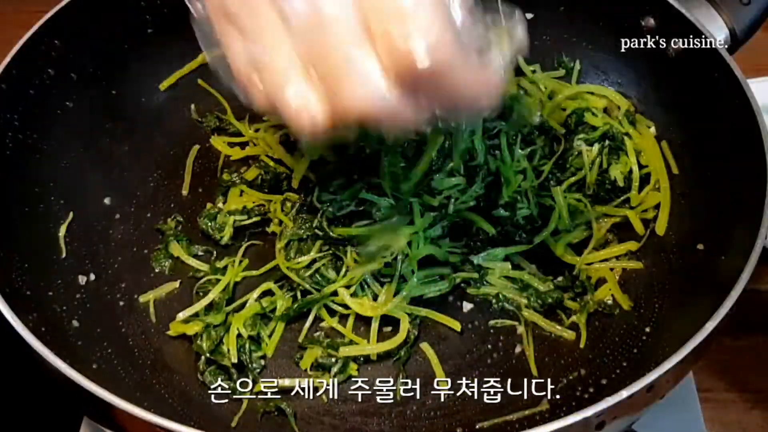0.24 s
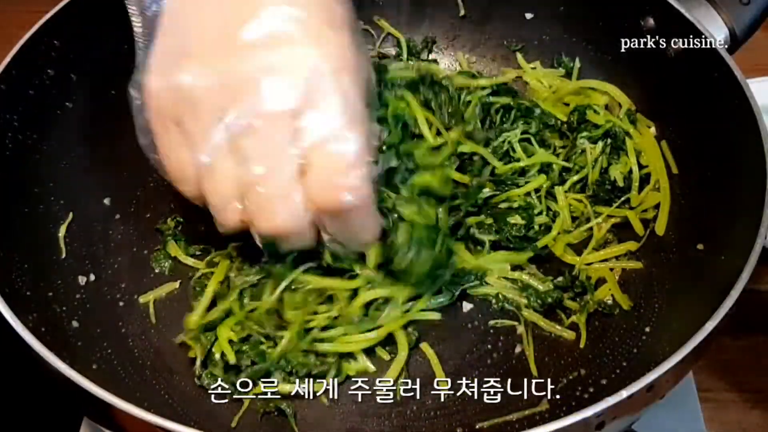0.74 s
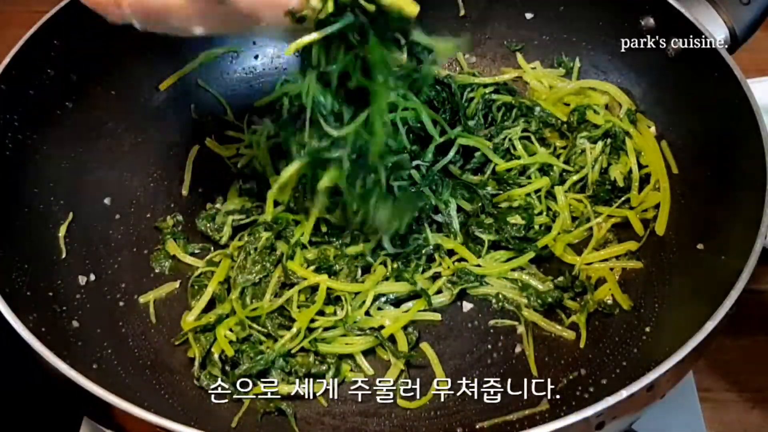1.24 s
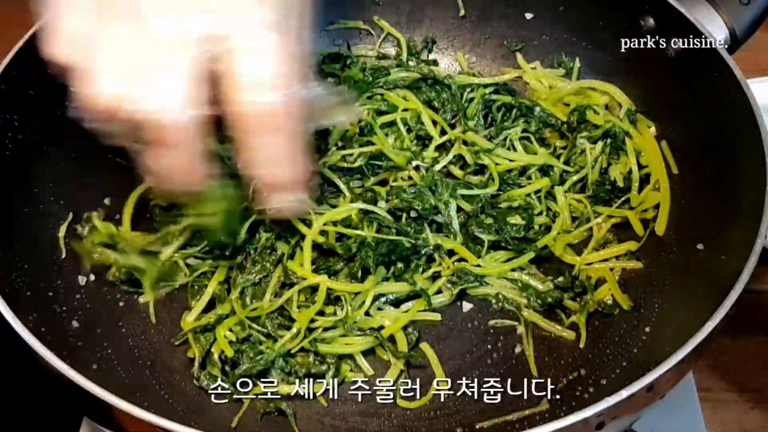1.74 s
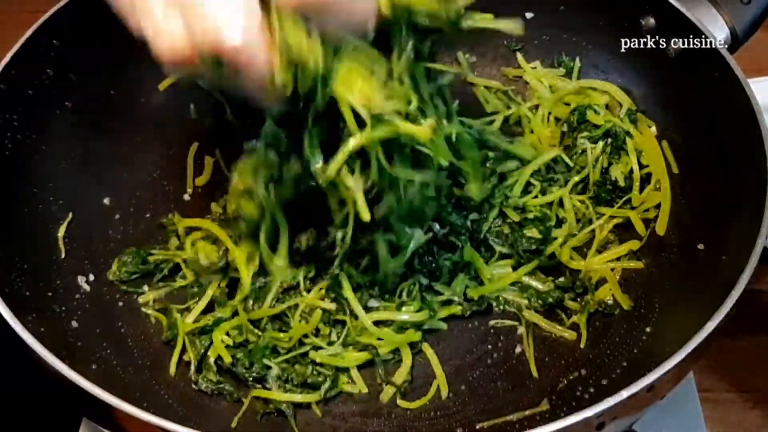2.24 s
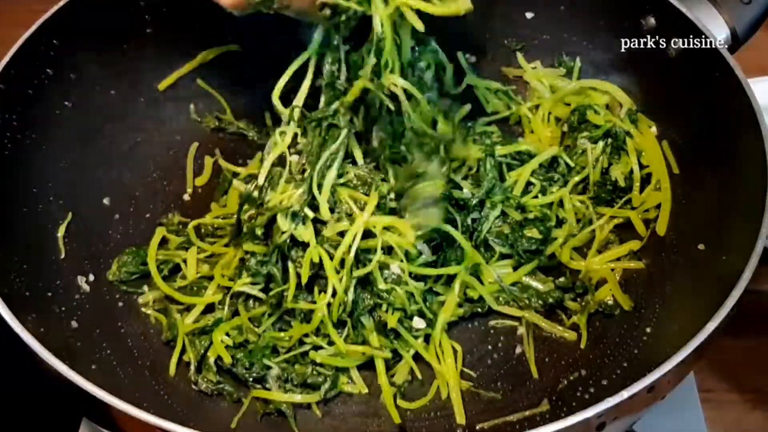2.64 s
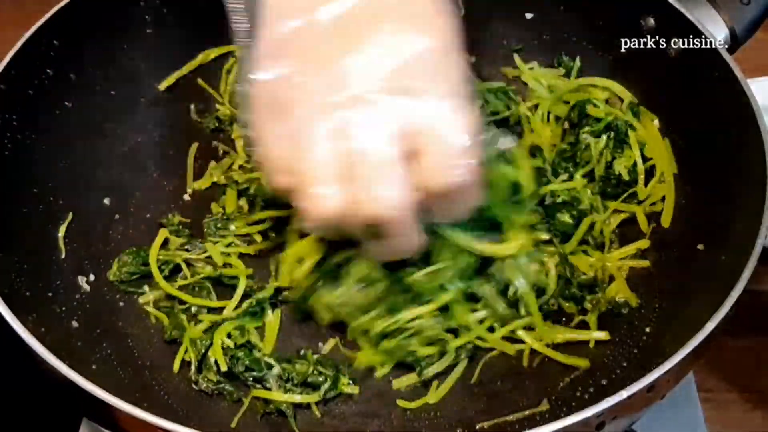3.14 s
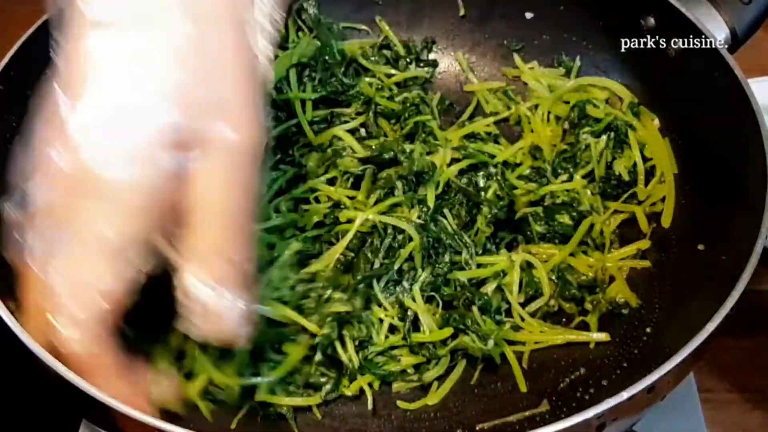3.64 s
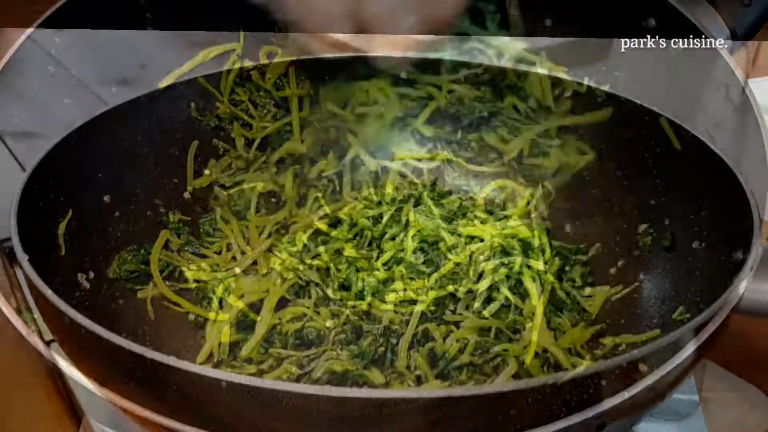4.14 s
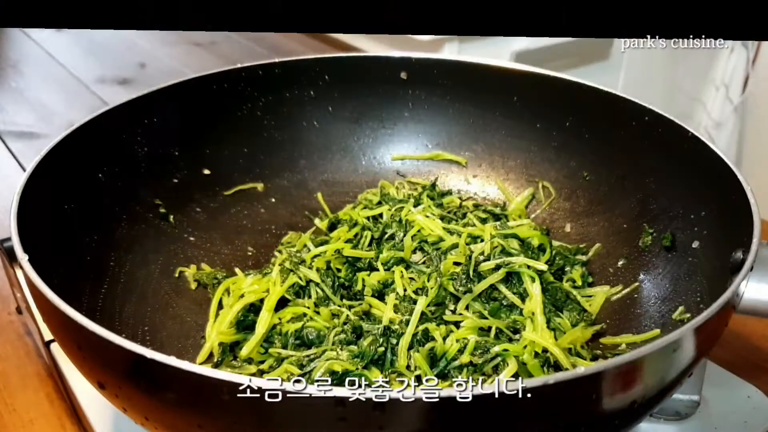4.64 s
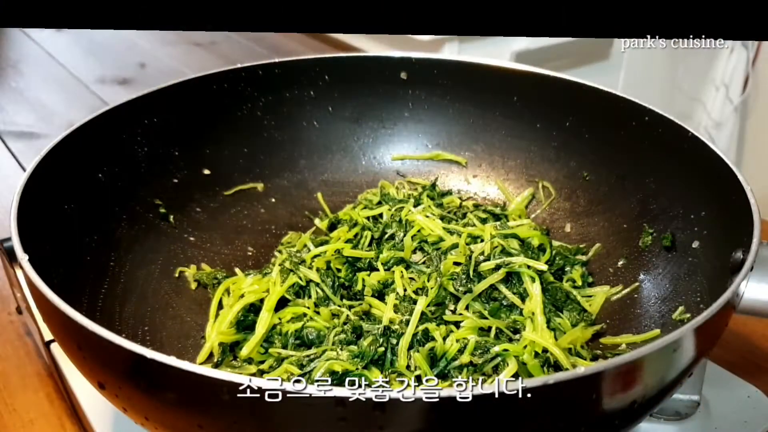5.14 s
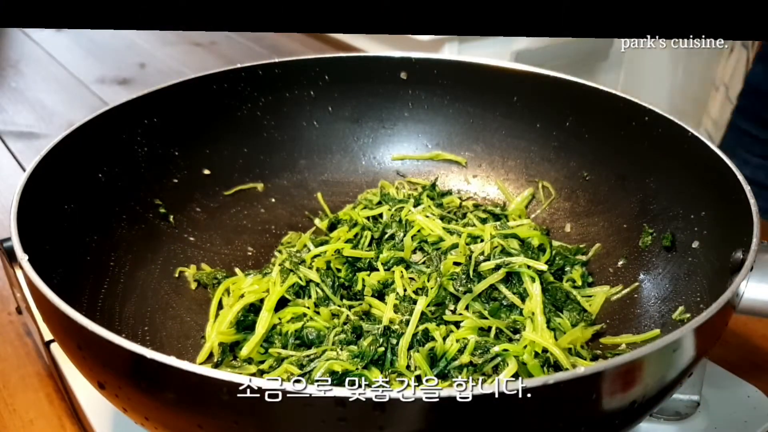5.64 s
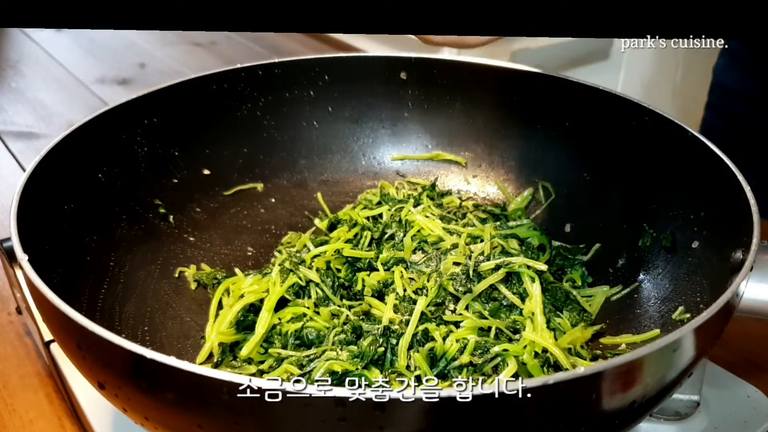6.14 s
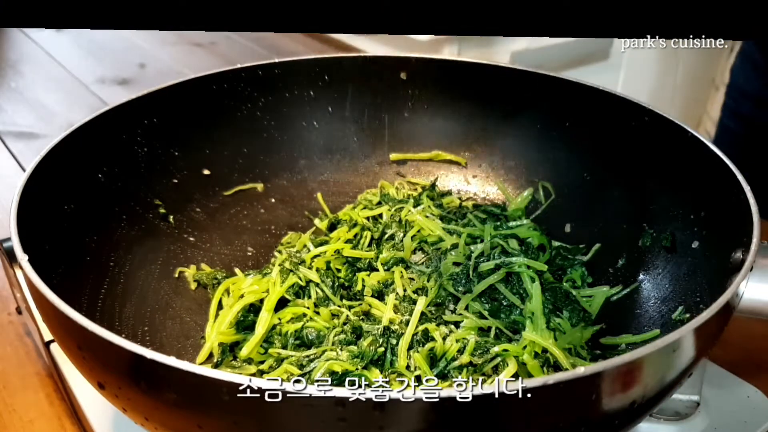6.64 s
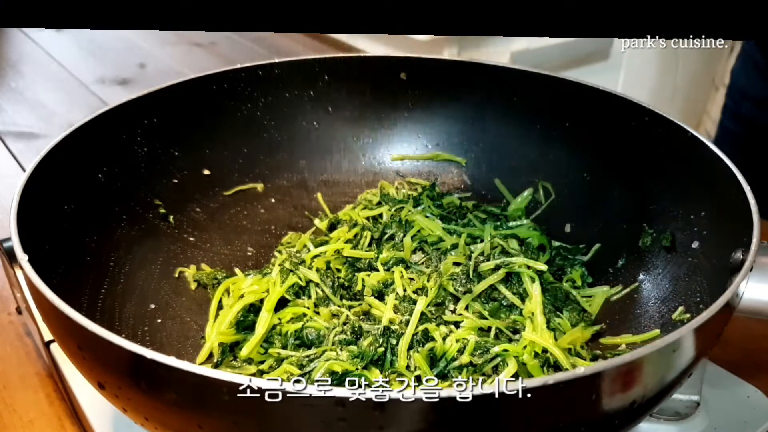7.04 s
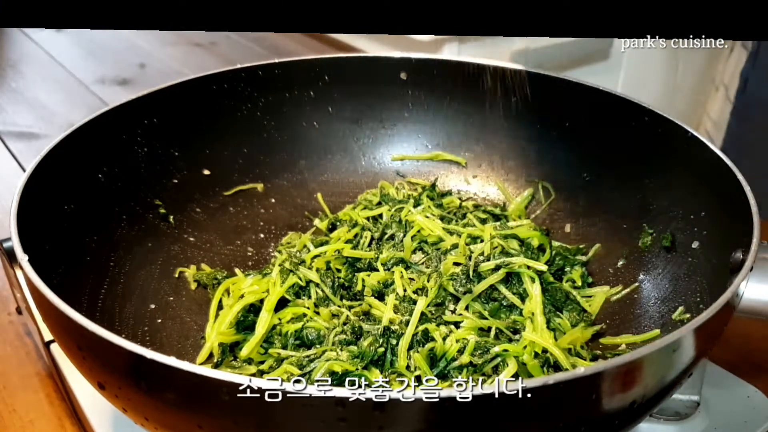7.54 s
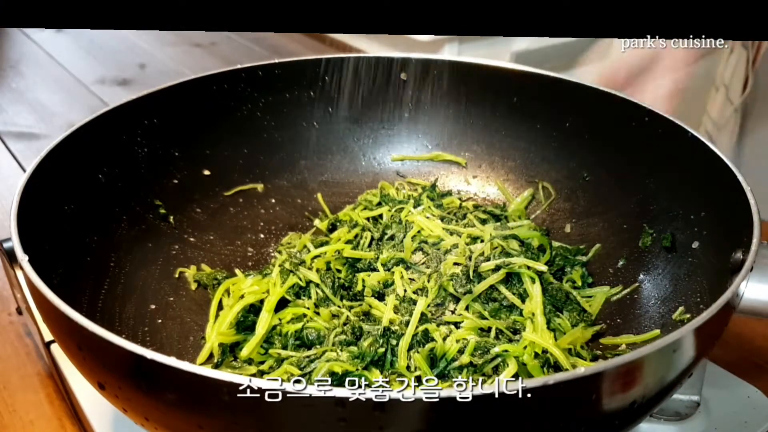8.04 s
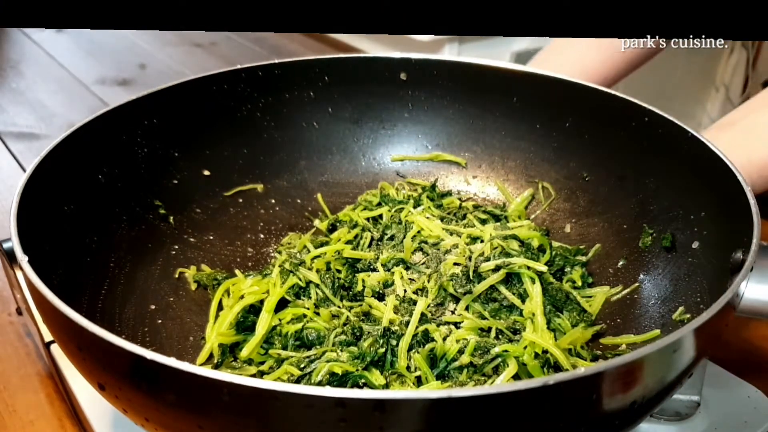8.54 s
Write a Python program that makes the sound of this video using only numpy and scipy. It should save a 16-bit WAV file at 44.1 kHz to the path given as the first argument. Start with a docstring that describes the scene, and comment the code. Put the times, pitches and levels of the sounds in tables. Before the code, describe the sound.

Soft crackly tossing of damp greens in a pan, then sharp wok knocks, a rattling jar set down, and short rhythmic bursts from a salt shaker.

```python
"""A hand in a thin plastic glove tosses wet greens in a wok: shaped streams of clicks, filtered and snapped.
The wok judders when nudged (resonated slips), then knocks twice on the stove; a jar is put down and rocks
to rest. Both are noise cracks plus decaying modes. A salt shaker is shaken seven times: clicks through its
hollow, then grains pattering into the wok. Filtered noise and a mains hum lie beneath a small kitchen."""
import sys
import numpy as np
from scipy import signal
from scipy.fft import rfft, irfft
from scipy.io import wavfile
from scipy.ndimage import uniform_filter1d

SR = 44100
rng = np.random.default_rng(int(sys.argv[2]) if len(sys.argv) > 2 else 0)


def store_pcm(level_fs):
    """Save levels as 16-bit WAV."""
    pcm = np.round(np.clip(level_fs, -1, 1) * 32767).astype(np.int16)
    wavfile.write(sys.argv[1], SR, np.atleast_2d(pcm).T)


N = 387198
T = np.arange(N) / SR


# hand sweeps greens across the wok: [start_s, rise_s, hold_s, crinkle_db, rub_db, wok_hum_db]
HAND_SWEEPS = [(0.057, 0.077, 0.017, -46, -46, -65), (0.571, 0.12, 0.13, -46, -52, -71),
               (1.878, 0.053, .15, -47, -51, -65.5), (2.809, 0.033, 0.056, -49.5, -59.5, -73),
               (3.0, 0.098, 0.18, -51, -56, -65), (3.718, 0.022, 0.018, -47.5, -49.5, -61.5),
               (3.659, 0.37, 0.095, -44, -49.5, -58)]
SWEEP_RELEASE_DB_PER_S = 92.5
GRIP_DB, GRIP_PER_S = 1.86, 35


def sweeping():
    """Crinkle, rub and wok hum share each sweep and a grip that tightens and slips, so they cluster."""
    gains = 0
    for start_s, rise_s, hold_s, *levels_db in HAND_SWEEPS:
        gains = gains + amp(levels_db)[:, None] * stroke(start_s, rise_s, hold_s, SWEEP_RELEASE_DB_PER_S)
    return amp(GRIP_DB * lumps(per_s=GRIP_PER_S)) * gains


# a handful is lifted and unsticks: [start_s, hold_s, level_db]
LIFTS = [(0.416, 0.098, -55), (0.99, 0.25, -55), (1.382, 0.42, -61.5), (1.778, 0.067, -54),
         (2.196, 0.21, -54.5), (2.496, 0.12, -63.5), (3.44, 0.38, -57.5)]
LIFT_RISE_S, LIFT_RELEASE_DB_PER_S = 0.014, 198


def lifting():
    """Gain of the lifts: quick rise, hold and fast release."""
    return sum(amp(level_db) * stroke(start_s, LIFT_RISE_S, hold_s, LIFT_RELEASE_DB_PER_S)
               for start_s, hold_s, level_db in LIFTS)


POPS_PER_S, POP_SPREAD_DB = 22, 3.5  # at each pitch


def unsticking_pops():
    """Leaves unstick in sparse little pops at eight pitches."""
    pops = 0
    for hz in np.geomspace(4500, 14000, 8):
        clicks = grains(per_s=POPS_PER_S, spread_db=POP_SPREAD_DB)
        pops = pops + resonate_twice(clicks, hz, hz / 3)
    return evened(pops)


# spectrum of glove film and stems: [freq_hz, density_db]
FILM_COLOUR = [(100, -22), (1500, -17), (2800, -5.5), (4200, 1), (7000, 2.5), (8500, -0.5), (11000, 1.5),
               (16000, -2)]
POPS_LIFTED, POPS_DRAGGED = 0.57, 0.14  # power share of the crinkle


def crinkle(crinkling, lift):
    """Film and leaves crackle finely; lifting gives more pops, dragging drowns them."""
    film = colour(grains(per_s=2000, spread_db=2.5), FILM_COLOUR)
    film_gain = np.sqrt((1 - POPS_DRAGGED) * crinkling ** 2 + (1 - POPS_LIFTED) * lift ** 2)
    pop_gain = np.sqrt(POPS_DRAGGED * crinkling ** 2 + POPS_LIFTED * lift ** 2)
    return film * film_gain + unsticking_pops() * pop_gain


# spectrum of leaves dragged over the pan: [freq_hz, density_db]
RUB_COLOUR = [(100, -23), (400, -5), (700, -3.5), (960, 8.5), (1250, 0), (2200, 2.5), (3500, 1.5),
              (6000, -4.5), (16000, -21)]


def rub(rubbing, lift):
    """Leaves dragged over the pan give a lower rub, with a little in each lift."""
    return colour(grains(per_s=1100, spread_db=3.0), RUB_COLOUR) * np.hypot(rubbing, amp(-13) * lift)


# later handling rustles, three strong, two faint: [start_s, rise_s, hold_s, level_db, release_db_per_s]
HANDLINGS = [(4.287, 0.074, .03, -41, 83), (4.641, 0.013, 0.023, -37.5, 300),
             (4.955, 0.089, .16, -53.5, 103), (5.251, 0.044, 0.038, -40, 109.5),
             (5.619, 0.078, 0.25, -53, 100)]
# their spectrum: [freq_hz, density_db]
RUSTLE_COLOUR = [(100, -1.5), (900, -2.5), (2000, -1.5), (6500, -0.5), (8500, -2.5), (11000, -1),
                 (16000, -2.5)]


def rustle():
    """Dense fine clicks of later handling."""
    handling = sum(amp(level_db) * stroke(start_s, rise_s, hold_s, release_db_per_s)
                   for start_s, rise_s, hold_s, level_db, release_db_per_s in HANDLINGS)
    return colour(grains(per_s=15000, spread_db=5.0), RUSTLE_COLOUR) * handling


# loudest snaps of film and stems: [start_s, level_db (before the offset), centre_hz]
FILM_SNAPS = [(.1002, -35.5, 12100), (.155, -32.5, 5430), (.3123, -40.5, 11300), (0.4887, -38, 7100),
              (0.6107, -39, 4700), (.6926, -35.5, 7010), (1.1233, -39, 9110), (1.2061, -36.5, 11400),
              (1.259, -39, 13500), (1.5274, -43.5, 5750), (1.6456, -47, 9110), (1.919, -34, 8270),
              (2.1005, -38.5, 10100), (2.2405, -38.5, 6050), (2.3428, -37.5, 14300), (3.025, -36.5, 15400),
              (3.0865, -38, 7030), (3.232, -32.5, 10800), (3.448, -40, 6150), (3.5387, -47, 10700),
              (3.7395, -32, 3870), (6.2823, -39.5, 11500), (6.483, -32.5, 6110), (6.851, -34.5, 11400),
              (7.034, -44, 10050)]
SNAP_OFFSET_DB = 18.5


def snaps():
    """A crease pops or a stem breaks: a short bright tick."""
    out = np.zeros((2, N))
    for start_s, level_db, centre_hz in FILM_SNAPS:
        tick = resonate(colour(burst(decay_s=0.041), FILM_COLOUR), centre_hz, width_hz=6800)
        add(out, start_s, amp(level_db + SNAP_OFFSET_DB) * unit(tick))
    return out


# resonances of the wok on its stand: [freq_hz, width_hz (half that of each filter pass), level_db]
HELD_WOK_MODES = [(347, 39, -1.5), (538, 51, 4), (964, 79, -7.5)]


def judder(low_db, size):
    """Small slips on the stand hum in the wok's lowest resonances."""
    slips = grains(per_s=1500, spread_db=1.0, size=size)
    low, *upper = (amp(level_db) * resonate_twice(slips, freq_hz, 2 * width_hz)
                   for freq_hz, width_hz, level_db in HELD_WOK_MODES)
    return evened(amp(low_db) * low + sum(upper))


# wok nudged on its stand: [start_s, level_db, length_s, lowest_mode_db]
NUDGES = [(0.824, -57.5, 0.056, -1.5), (2.528, -58.5, .08, -5), (2.905, -51, 0.038, -13),
          (3.733, -44, .052, -7.5), (4.012, -40.5, 0.044, 8.5), (4.648, -43.5, 0.069, 1)]


def pushes(humming):
    """The wok judders under each sweep and nudge."""
    out = humming * judder(low_db=-2.5, size=N)
    for start_s, level_db, length_s, low_db in NUDGES:
        add(out, start_s, shove(level_db, length_s) * judder(low_db, size=SR // 2))
    return out


# wok meets the stove: [start_s, level_db, tilt_db_per_octave, struck_spot_hz]
WOK_KNOCKS = [(4.1908, 7.999, 2.2, 2010), (4.3739, 7.495, 0.5, 975)]
# crack spectrum: [freq_hz, density_db]
KNOCK_COLOUR = [(30, -30.5), (250, -37.5), (600, -7.5), (1000, 6), (1400, -2.5), (2200, -1), (2700, -9),
                (4200, -12), (6300, -12), (8500, -20.5), (16000, -29)]
# ringing modes of the wok: [freq_hz, level_db, t60_s]
WOK_MODES = [(350, 1, .24), (538, -8, .2), (635, -3, .13), (942, -2, .17), (1020, 0, .1), (1290, -8, .16),
             (1572, -6, .14), (1775, -6, .16), (2143, -3, .22), (2955, -5, .09)]


def wok_knocks():
    """The wok hits the stove: a crack and a faint ring."""
    return blows(WOK_KNOCKS, KNOCK_COLOUR, WOK_MODES, crack_s=0.034, ring_db=-12.5, spot_db=-16.0)


# other dull bumps: [start_s, level_db, length_s, centre_hz]
DULL_BUMPS = [(2.692, -59.5, 0.073, 139), (5.07, -50.5, 0.13, 141), (6.149, -60.5, .2, 223),
              (6.551, -63.5, 0.29, 200)]
NUDGE_BUMP_DB, NUDGE_BUMP_S, NUDGE_BUMP_HZ = -14, 0.22, 149.4  # dB re the nudge
KNOCK_BUMP_DB, KNOCK_BUMP_S, KNOCK_BUMP_HZ = -59.5, 0.12, 79.5  # dB re the knock


def worktop_bumps():
    """Each nudge and knock bumps the worktop, as do a few other thumps: low resonated noise."""
    out = np.zeros((2, N))
    nudged = [(s, db + NUDGE_BUMP_DB, NUDGE_BUMP_S, NUDGE_BUMP_HZ) for s, db, *_ in NUDGES]
    knocked = [(s, db + KNOCK_BUMP_DB, KNOCK_BUMP_S, KNOCK_BUMP_HZ) for s, db, *_ in WOK_KNOCKS]
    for start_s, level_db, length_s, hz in DULL_BUMPS + nudged + knocked:
        thump = evened(resonate_twice(diffuse(size=SR // 2), hz, hz * 0.71))
        add(out, start_s, shove(level_db, length_s) * thump)
    return out


# jar lands and rocks: [start_s, level_db, tilt_db_per_octave, counter_hz, rim_db (re level_db)]
JAR_ROCKS = [(4.7902, 5, -0.5, 1400, -52), (4.9762, -1, -1, 730, -20), (5.0645, 4.5, 1, 700, -12),
             (5.1555, 3, 0, 700, -2.5), (5.2266, 6, 0.8, 2350, -7), (5.286, -1.5, .5, 600, -0.5),
             (5.324, -2, -2.5, 810, -23), (5.3595, -0.5, 1.5, 830, -11)]
# crack spectrum: [freq_hz, density_db]
CLACK_COLOUR = [(30, -50), (260, -23), (400, -4), (750, 0), (1100, -4), (1600, -4), (2880, 1), (3280, -19),
                (4000, -16), (4480, -5), (5000, -23), (6500, -21), (8000, -33), (16000, -46)]
# ringing modes of the jar: [freq_hz, level_db, t60_s]
JAR_MODES = [(418, -8, 0.26), (505, -4.5, 0.31), (598, -11, .18), (745.7, 3, 0.16), (808, -0.5, .22),
             (966, -4.5, 0.2), (1924, 4, 0.096), (2374, -7, .14), (2460, -6, 0.1), (2840, -6, 0.094),
             (2930, 6, 0.09), (4420, -21, .14), (4510, -2.5, .12), (6450, -30, .25)]
RIM_LEAD_S = 0.0065


def jar_rocks():
    """At each rock the jar's rim touches first and its base follows."""
    rims = [(start_s - RIM_LEAD_S, level_db + rim_db, tilt_db, hz)
            for start_s, level_db, tilt_db, hz, rim_db in JAR_ROCKS]
    bases = [row[:4] for row in JAR_ROCKS]
    return blows(rims + bases, CLACK_COLOUR, JAR_MODES, crack_s=0.061, ring_db=-5.5, spot_db=-7.0)


# spectrum of salt against the cap: [freq_hz, density_db]
SALT_COLOUR = [(40, -29), (330, -19), (520, -15.5), (900, -12), (1500, -4), (2700, -2.5), (3500, -7.5),
               (5500, -12.5), (8400, -24.5), (16000, -30.5)]


def salt_crash(size):
    """Salt strikes the cap in lumps: clicks of fluctuating level."""
    clicks = grains(per_s=1800, spread_db=2.5, size=size)
    return colour(clicks * amp(4.1 * lumps(per_s=110.6, size=size)), SALT_COLOUR)


# hollow of the shaker: [freq_hz, width_hz, level_db]
HOLLOW_MODES = [(1570, 240, -7.5), (1877, 47, -1.5), (1990, 61, 0.5), (2380, 190, -4), (2710, 220, -11.5)]
# spectrum of fine grains in the holes: [freq_hz, density_db]
FIZZ_COLOUR = [(300, -18.5), (2000, -5.5), (4500, 3.5), (6500, 3.5), (8400, -3), (11000, 2), (16000, -4.5)]


def shaken_salt(size):
    """Lumps ring the hollow while fine grains fizz through the holes."""
    # the load shifts inside, so each resonance gets its own crash and flares alone
    hollow = evened(sum(amp(level_db) * evened(resonate(salt_crash(size), freq_hz, width_hz))
                        for freq_hz, width_hz, level_db in HOLLOW_MODES))
    fizz = colour(grains(per_s=9000, spread_db=3.5, size=size), FIZZ_COLOUR)
    return amp(-4.0) * hollow + amp(-6.0) * evened(salt_crash(size)) + amp(-8.5) * fizz


# wok resonances rung by grains: [freq_hz, width_hz (of each filter pass), level_db]
PING_MODES = [(8600, 480, -5), (11360, 370, 2.5)]
# spectrum of landing grains: [freq_hz, density_db]
PATTER_COLOUR = [(200, -7), (1000, -11), (2200, 1), (9500, 3.5), (16000, 3)]
LANDING_RING_DB = -57


def landing_salt(t):
    """Grains patter into the wok and ring it unevenly, dying away after 90 ms."""
    salt = grains(per_s=1500, spread_db=0.0, size=len(t))
    pings = evened(sum(amp(level_db) * resonate_twice(salt, freq_hz, width_hz)
                       for freq_hz, width_hz, level_db in PING_MODES))
    ring_gain = amp(LANDING_RING_DB + 2.6 * lumps(per_s=46, size=len(t)))
    envelope = np.minimum(t / 0.013, 1) * amp(-140 * np.maximum(t - 0.09, 0))
    return envelope * (amp(-51.0) * colour(salt, PATTER_COLOUR) + ring_gain * pings)


# strokes of the shaker: [start_s, length_s, level_db, droop_db]
SHAKER_STROKES = [(5.863, 0.2, -25, 6.5), (6.34, .12, -25, 6), (6.727, .079, -24.5, 5),
                  (7.103, .14, -26, 4.5), (7.505, 0.13, -25.5, 4), (7.902, .1, -24.5, 3.5),
                  (8.29, 0.12, -25, 6.5)]
# biggest clumps striking the cap: [start_s, level_db (before the offset)]
CAP_CLUMPS = [(5.908, -3), (6.381, -5), (6.757, 5), (7.573, 0), (7.589, 0.5), (7.922, -3.5), (7.959, 3.5),
              (8.399, -2)]
SHAKE_RISE = 0.23  # share of a stroke at which the flow peaks
SMALL_CLUMP_DB, CLUMP_OFFSET_DB = -6, -2
LANDING_DELAY_S = 0.023


def shaker():
    """Each stroke drives salt at the cap; grains land just after it and clumps crack on the cap."""
    out, t = np.zeros((2, N)), T[:SR // 2]
    for start_s, length_s, level_db, droop_db in SHAKER_STROKES:
        flow_s = [0, SHAKE_RISE * length_s, length_s, length_s + 0.036, 0.5]
        flow_db = level_db + np.interp(t, flow_s, [-27, 0, -droop_db, -32, -90])
        add(out, start_s, amp(flow_db) * shaken_salt(len(t)))
        add(out, start_s + length_s + LANDING_DELAY_S, landing_salt(t))
    # one small clump falls anywhere in the body of each stroke
    small = [(start_s + length_s * rng.uniform(0.2, 0.9), SMALL_CLUMP_DB)
             for start_s, length_s, *_ in SHAKER_STROKES]
    for start_s, level_db in CAP_CLUMPS + small:
        crack = colour(burst(decay_s=0.018), SALT_COLOUR)
        clump = resonate(crack, hz=rng.uniform(1770, 2570), width_hz=880)
        add(out, start_s, amp(level_db + CLUMP_OFFSET_DB) * unit(clump))
    return out


# hum breakpoints: [time_s, level_db (before the channel offsets)]
HUM_LEVELS = [(0, -66), (2, -59.5), (3.2, -54.5), (4.5, -60), (6.5, -58.5), (8.5, -73)]
# spectrum of rumble and hiss: [freq_hz, density_db]
FLOOR_COLOUR = [(15, -40.5), (32, -10), (62, 2), (107, -10.5), (150, -3), (210, -11), (420, -15.5),
                (610, -15), (1150, -25.5), (2670, -30), (6400, -20.5), (8000, -25), (11400, -23),
                (16000, -27.5)]
FLOOR_DB, MAINS_HZ = -59.5, 60


def background():
    """Low room rumble, a little hiss and an appliance's mains hum that swells and fades."""
    hum = amp(np.interp(T, *np.transpose(HUM_LEVELS))) * np.sin(2 * np.pi * MAINS_HZ * T)
    floor = amp(FLOOR_DB) * evened(colour(diffuse(size=N), FLOOR_COLOUR))
    return floor + hum * amp([[1.5], [-1.5]])


def blows(rows, spectrum, modes, crack_s, ring_db, spot_db):
    """Each blow gives a crack, a struck-spot resonance and the object's modes in varied shares."""
    out, t = np.zeros((2, N)), T[:SR // 2]
    for start_s, level_db, tilt_db, spot_hz in rows:
        crack = colour(burst(crack_s), spectrum, tilt_db)
        spot = unit(resonate(crack, spot_hz, spot_hz / 14))
        add(out, start_s, amp(level_db) * unit(unit(crack) + amp(spot_db) * spot))
        ring = 0
        for hz, mode_db, t60_s in modes:
            # the two channels' phases drift apart with pitch
            phase = rng.uniform(0, 2 * np.pi) + rng.normal(0, min(hz / 1500, 2), (2, 1))
            share_db = mode_db + rng.normal(0, 0.67) + tilt_db * np.log2(hz / 1000)
            ring = ring + amp(share_db - 60 * t / t60_s) * np.sin(2 * np.pi * hz * t + phase)
        add(out, start_s, amp(level_db + ring_db) * unit(ring * np.minimum(t / 0.0025, 1)))
    return out


def burst(decay_s, size=4096):
    """A crowd of heavily damped modes: a dense crack of evened spectrum, softly clipped."""
    z = rfft(diffuse(size=size) * amp(-60 * T[:size] / decay_s))
    flat = z / np.sqrt(uniform_filter1d(abs(z) ** 2, size // 64, axis=1))
    crack = unit(irfft(flat) * amp(-20 * T[:size] / decay_s))
    return unit(np.tanh(2 * crack / abs(crack).max()))


def grains(per_s, spread_db, size=N):
    """Random clicks of uneven size, each with its own delay and level between channels."""
    at = np.flatnonzero(rng.random(size) < per_s / SR)
    height_db = spread_db * np.minimum(rng.exponential(1, len(at)), 4)
    height = amp(height_db) * rng.choice([-1, 1], len(at))
    lag_samples = rng.normal(0, 5, len(at)).round().astype(int)
    side_db = rng.normal(0, 2, len(at))
    out = np.zeros((2, size))
    out[0, at] = height * amp(side_db)
    out[1, np.clip(at + lag_samples, 0, size - 1)] = height * amp(-side_db)
    return evened(out)


def lumps(per_s, size=N):
    """Random normal levels, per_s a second, joined by straight lines."""
    knots = rng.standard_normal(size // 20 + 2)
    return np.interp(T[:size] * per_s, np.arange(len(knots)), knots)


def shove(level_db, length_s):
    """A force that builds quickly and lets go."""
    u = T[:SR // 2] / length_s
    return amp(level_db) * np.minimum(u / 0.043, 1) * np.exp(-u ** 2)


SWELL_DB, SAG_DB_PER_S = 20, 3


def stroke(start_s, rise_s, hold_s, release_db_per_s):
    """Gain of one hand movement: it swells, sags while held and dies away."""
    t = T - start_s - rise_s
    swell_db = SWELL_DB * np.minimum(t / rise_s, 0)
    sag_db = SAG_DB_PER_S * np.clip(t, 0, hold_s)
    return amp(swell_db - sag_db - release_db_per_s * np.maximum(t - hold_s, 0))


# left-right likeness: [freq_hz, correlation]
CHANNEL_LIKENESS = [(60, .88), (300, 0.83), (640, 0.36), (1400, 0), (3000, 0.054), (16000, 0.19)]


def diffuse(size):
    """Two-channel noise: alike in the bass, mostly unrelated in the treble."""
    left, other = rfft(rng.standard_normal((2, size)))
    same = np.clip(read(CHANNEL_LIKENESS, np.fft.rfftfreq(size, 1 / SR)), -1, 1)
    return irfft([left, same * left + np.sqrt(1 - same ** 2) * other], size)


# kitchen reverberation: [freq_hz, t60_s]
KITCHEN_DECAY = [(100, 0.64), (600, 0.43), (2000, 0.32), (6000, 0.38), (16000, 0.36)]


def room(x, wet_db):
    """Direct sound plus the kitchen's tail, each band dying at its own speed."""
    hz, t, z = signal.stft(diffuse(size=SR // 2), SR, nperseg=256)
    decay = amp(-60 * t / read(KITCHEN_DECAY, hz)[:, None])
    tail = signal.istft(z * decay, SR, nperseg=256)[1]
    tail *= np.clip((T[:tail.shape[1]] - 0.002) / 0.004, 0, 1)
    return x + amp(wet_db) * convolve(x, unit(tail))


def colour(x, points, tilt_db=0, size=2048):
    """Causal minimum-phase filter of unit energy; tilt in dB per octave."""
    hz = abs(np.fft.fftfreq(size, 1 / SR))
    log_gain = np.log(amp(read(points, hz) + tilt_db * np.log2((hz + 200) / 1500)))
    response = np.fft.ifft(np.exp(np.conj(signal.hilbert(log_gain)))).real
    return convolve(x, unit(response))


def resonate(x, hz, width_hz):
    """One damped resonance."""
    return signal.lfilter(*signal.iirpeak(hz, hz / width_hz, SR), x)


def resonate_twice(x, hz, width_hz):
    """The same resonance in series, for steeper skirts."""
    return resonate(resonate(x, hz, width_hz), hz, width_hz)


def convolve(x, response):
    """Each channel through the response, cut to the input length."""
    return signal.fftconvolve(x, np.atleast_2d(response), axes=1)[:, :x.shape[1]]


def read(points, hz):
    """Table value at hz, interpolated on log frequency."""
    f, value = np.transpose(points)
    return np.interp(np.log(hz + 1), np.log(f + 1), value)


def add(mix, start_s, sound):
    """Mix in a sound at start_s, cut at the end."""
    part = mix[:, round(start_s * SR):][:, :sound.shape[-1]]
    part += sound[..., :part.shape[1]]


def amp(db):
    """Decibels to amplitude."""
    return 10 ** (np.asarray(db) / 20)


def evened(x):
    """RMS 1 over both channels."""
    return x / np.sqrt(np.mean(x ** 2) + 1e-20)


def unit(x):
    """Energy 1 per channel."""
    return x / np.sqrt(np.sum(x ** 2, -1, keepdims=True) + 1e-20)


def scene():
    """Hand slightly left, salt slightly left, wok and jar knocks with more room, over the background."""
    crinkling, rubbing, humming = sweeping()
    lift = lifting()
    greens = crinkle(crinkling, lift) + rub(rubbing, lift) + rustle()
    hand = room(greens + snaps() + pushes(humming) + worktop_bumps(), wet_db=-8.5)
    knocks = room(wok_knocks() + jar_rocks(), wet_db=-4.5)
    salt = room(shaker(), wet_db=-7.5)
    return hand * amp([[1.1], [-1.1]]) + knocks + salt * amp([[0.8], [-0.8]]) + background()


STOP_S, FADE_S, EDGE_HZ = 8.517, 0.006, 16050


def record(dry):
    """A very short fade to silence at STOP_S, then a low-pass at EDGE_HZ."""
    live = np.clip((STOP_S - T) / FADE_S, 0, 1)
    low_pass = signal.firwin(511, EDGE_HZ, window=("kaiser", 9), fs=SR)
    return signal.oaconvolve(dry * live, low_pass[None], "same")


dry = scene()
out = record(dry)
store_pcm(out)
```